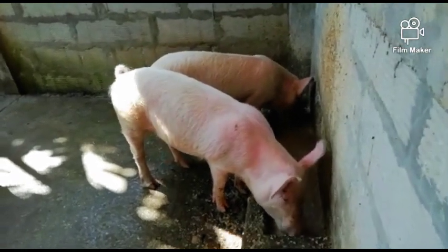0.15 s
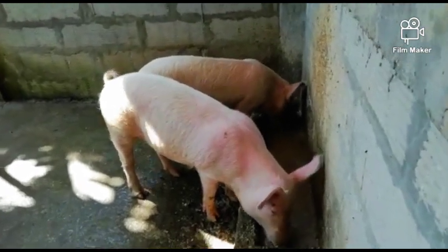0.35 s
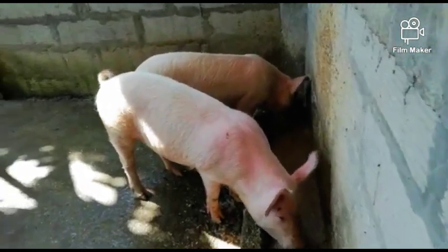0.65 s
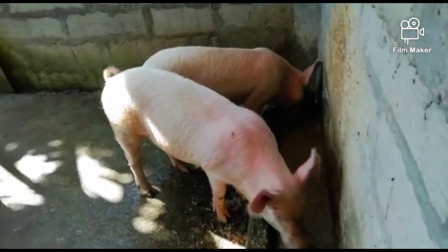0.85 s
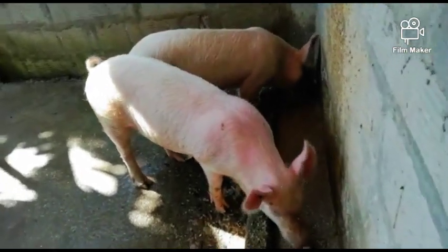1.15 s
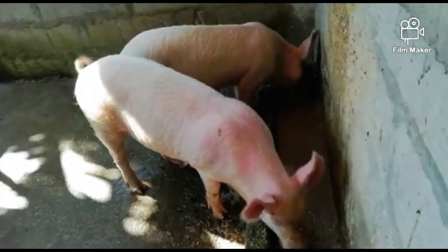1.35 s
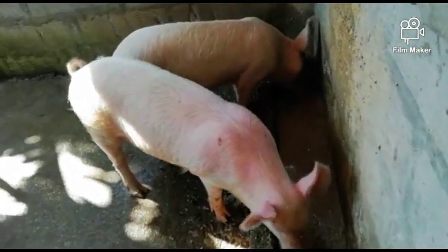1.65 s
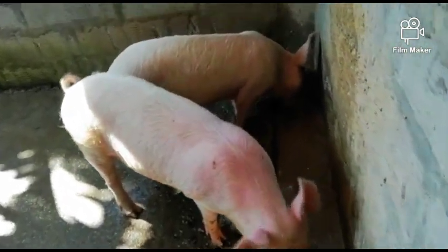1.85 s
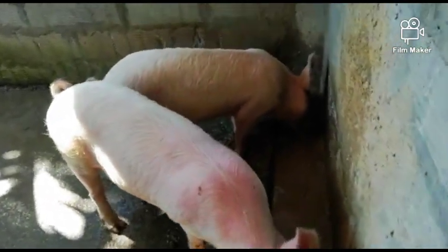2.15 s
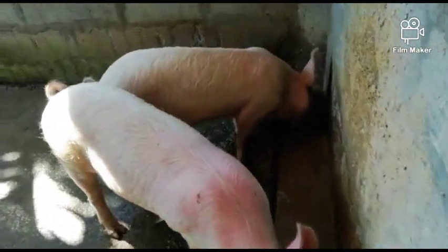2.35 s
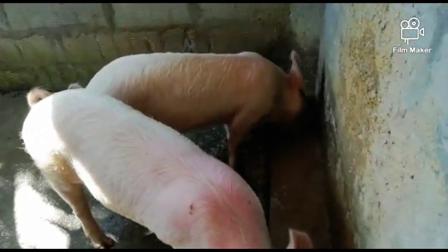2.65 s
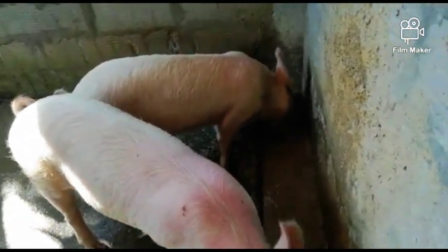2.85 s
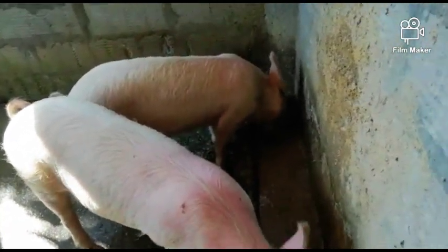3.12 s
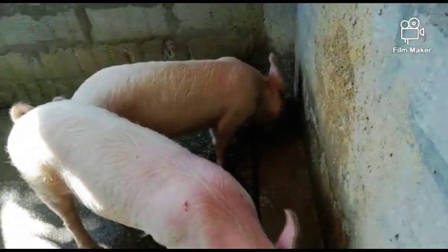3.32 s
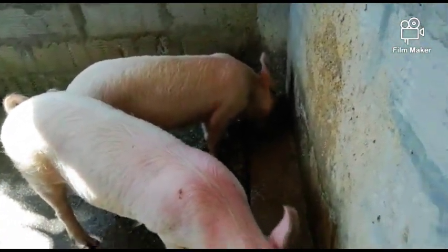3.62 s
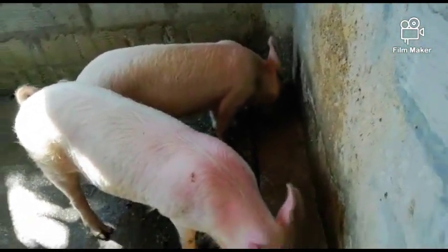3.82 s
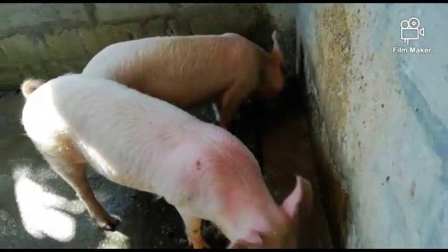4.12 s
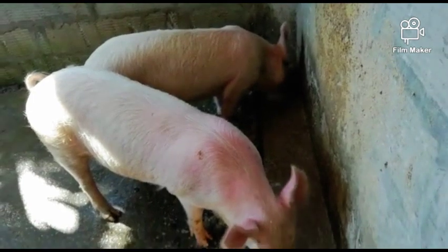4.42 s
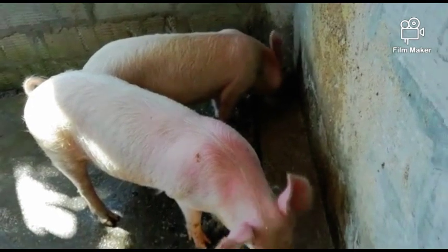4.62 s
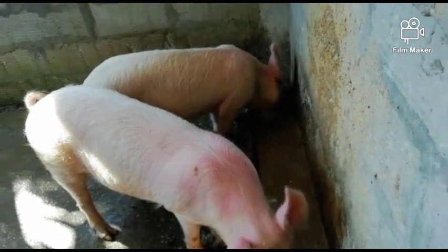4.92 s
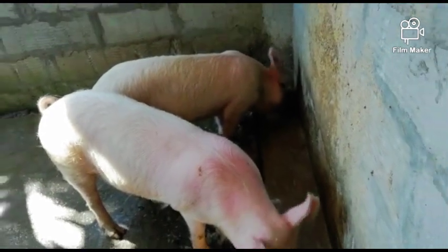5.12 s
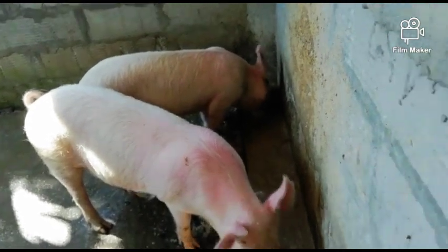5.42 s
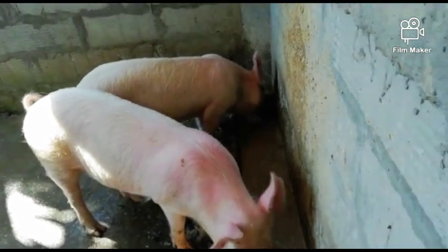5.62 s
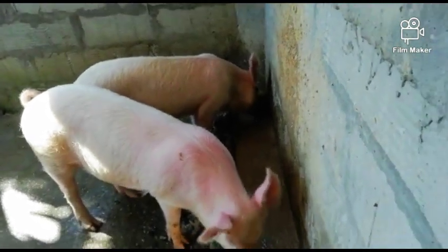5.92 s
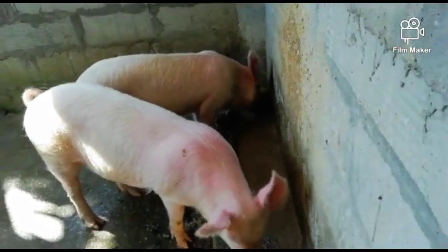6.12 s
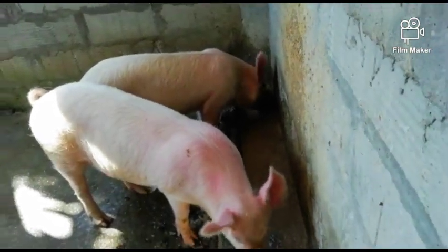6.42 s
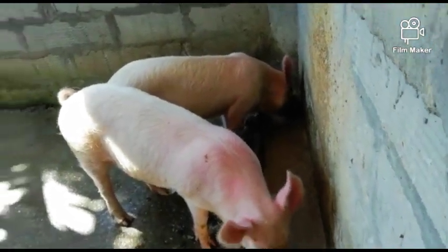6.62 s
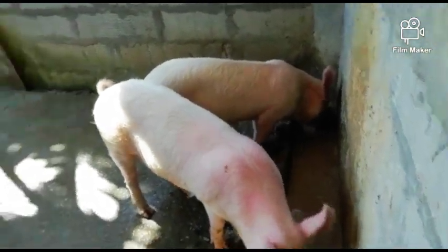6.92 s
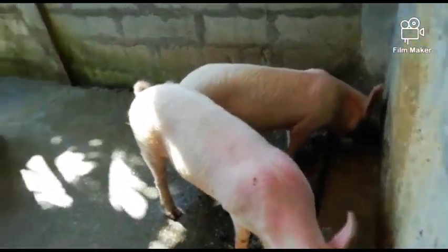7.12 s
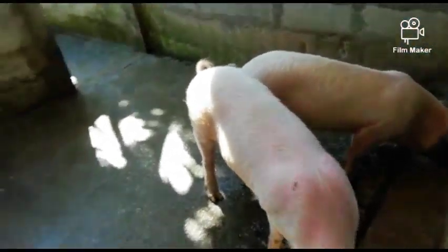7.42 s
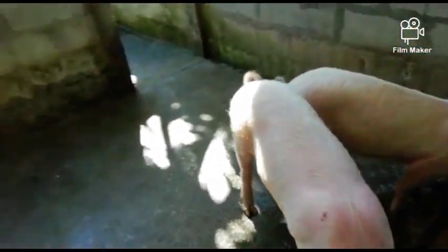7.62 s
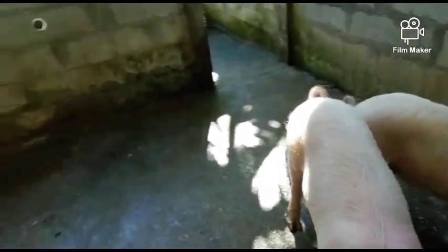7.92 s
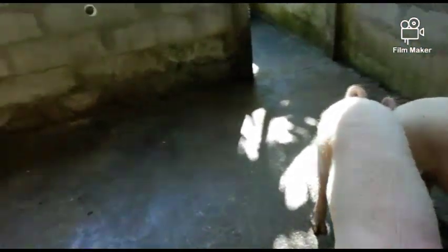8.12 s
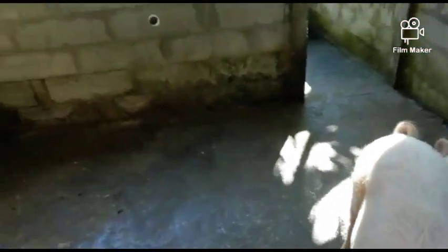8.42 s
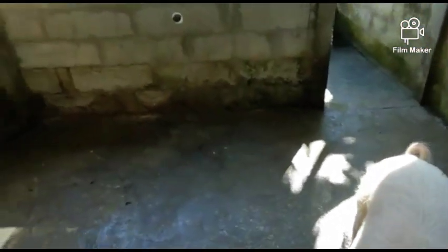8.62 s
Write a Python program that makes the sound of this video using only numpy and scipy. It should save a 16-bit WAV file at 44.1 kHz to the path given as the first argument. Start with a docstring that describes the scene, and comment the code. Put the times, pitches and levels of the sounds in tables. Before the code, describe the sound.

Close wet pig chewing with lip smacks and crackling spittle, broken by occasional low pulsing grunts that resonate between hard walls, plus light wind buffeting.

```python
"""Two young pigs feed at a wet trough in a small concrete pen, close to a hand-held microphone.
Over a steady yard hush, mash grains squelch and spittle crackles; air buffets the microphone now and then.
Sucked-in mash slurps, parting lips smack, films of spittle snap and thin wet whistles squeak in between.
Four short grunts, trains of throat pulses each with a vowel of its own, boom between the walls.
Soft throaty murmurs follow the first, snouts knock on the trough, and the third breaks into a hoarse moan."""
import sys
import numpy as np
from scipy import signal
from scipy.fft import rfft, irfft, next_fast_len
from scipy.io import wavfile
from scipy.ndimage import map_coordinates

SR = 44100
rng = np.random.default_rng(int(sys.argv[2]) if len(sys.argv) > 2 else 0)


def unload_wav(signal):
    """Save mono or channel-first audio to the path in sys.argv[1] as 16-bit WAV at rate SR, clipped to [-1, 1]."""
    wavfile.write(
        sys.argv[1],
        SR,
        np.round(np.clip(np.atleast_2d(signal).T, -1, 1) * 32767).astype(np.int16),
    )


N = 386316
TIME = np.arange(N) / SR

# how busily the pigs chew, before each layer's own trim: time_s, level_db
CHEWING_LEVELS = [(0.0, -56.5), (0.88, -52.5), (1.39, -60.5), (1.95, -55), (2.1, -47), (2.45, -56.5),
                  (3.07, -58.5), (4.03, -56.5), (4.78, -58.5), (5.08, -50), (5.29, -59), (6.17, -58.5),
                  (6.44, -52.5), (6.8, -57.5), (7.37, -56), (7.54, -53), (7.88, -57.5), (8.42, -55.5)]
# the low vowel resonance, whose pitch follows the jaw: width_hz, level_db, change_db_per_s
JAW_RESONANCE = (136, 3.8, -27)


def from_db(db):
    """Decibels to an amplitude factor."""
    return 10 ** (np.asarray(db) / 20)


def rms_one(x):
    """Scale a signal to an rms of 1."""
    return x / np.sqrt(np.mean(x ** 2) + 1e-20)


def at_hz(points, hz):
    """Read a spectrum on a log-frequency axis."""
    points = np.array(points)
    return np.interp(np.log(hz + 1e-9), np.log(points[:, 0]), points[:, 1])


def colour(x, spectrum):
    """Give a signal a spectral shape."""
    size = next_fast_len(x.shape[-1])
    gain = from_db(at_hz(spectrum, np.fft.rfftfreq(size, 1 / SR)))
    return irfft(rfft(x, size) * gain, size)[..., :x.shape[-1]]


def resonate(x, hz, width_hz):
    """One resonance with gain 1 on top."""
    r = np.exp(-np.pi * width_hz / SR)
    feed = np.array([1, 0, -1]) * (1 - r * r) / 2
    feedback = [1, -2 * r * np.cos(2 * np.pi * hz / SR), r * r]
    return signal.lfilter(feed, feedback, x + 1e-18)


def band_of(x, hz, width_hz):
    """A resonance applied twice, for dark valleys on both sides."""
    return resonate(resonate(x, hz, 1.5 * width_hz), hz, 1.5 * width_hz)


def bandpass(x, low_hz, high_hz):
    """Keep what lies between two frequencies."""
    return signal.sosfilt(signal.butter(2, [low_hz, high_hz], "band", fs=SR, output="sos"), x)


def swell(t, middle_s, length_s):
    """A smooth rise and fall."""
    return np.exp(-2 * ((t - middle_s) / length_s) ** 2)


def grains(size, per_s, spread_db):
    """Tiny clicks of uneven strength at random moments."""
    strength = from_db(spread_db * np.minimum(rng.exponential(1, size), 4))
    return (rng.random(size) < per_s / SR) * strength * rng.choice([-1, 1], size)


def slow_noise(size, width_hz):
    """Two unrelated wandering values; spread 1."""
    lowpass = signal.butter(2, width_hz / 2, fs=SR, output="sos")
    return rms_one(signal.sosfilt(lowpass, rng.standard_normal((2, size))))


def rough_tone(hz, width_hz):
    """Air in one resonance whose centre follows the curve hz; rms about 1."""
    rough = slow_noise(len(hz), width_hz)
    phase = 2 * np.pi * np.cumsum(hz) / SR
    return rough[0] * np.cos(phase) + rough[1] * np.sin(phase)


def panned(x, pan_db):
    """Spread a signal over two channels, the left louder by pan_db."""
    return x * from_db(np.array([[.5], [-.5]]) * pan_db)


def add(out, s, x):
    """Mix x in from time s on."""
    i = max(round(s * SR), 0)
    out[..., i:i + x.shape[-1]] += x[..., :N - i]


def diffuse(pair):
    """Two unrelated signals become a sound field whose left-right likeness depends on frequency."""
    # left against right: pitch_hz, likeness (1 same, 0 unrelated, -1 opposite)
    ear_likeness = [(100, 0.74), (300, 1), (600, -0.28), (1200, 0.5), (2500, 0)]
    size = next_fast_len(N)
    alike = np.clip(at_hz(ear_likeness, np.fft.rfftfreq(size, 1 / SR)), -1, 1)
    mid, side = rfft(pair, size)
    field = np.sqrt(1 + alike) * mid + np.sqrt(1 - alike) * side * [[1], [-1]]
    return rms_one(irfft(field, size)[:, :N])


def pen(x, build_s):
    """Dense echoes off bare concrete, different at each ear; the treble dies first."""
    # ring of the pen: pitch_hz, t60_s
    ring_times = [(250, 0.53), (900, 0.29), (2000, 0.28), (5500, 0.25), (14000, 0.22)]
    t = TIME[:SR // 2]
    echoes, edges = 0, np.geomspace(250, 16000, 9)
    for low, high in zip(edges, edges[1:]):
        band = bandpass(rng.standard_normal((2, len(t))), low, high)
        echoes = echoes + band * from_db(-60 * t / at_hz(ring_times, np.sqrt(low * high)))
    # the echoes build up gradually, with extra weight on the earliest
    echoes = echoes * (1 - np.exp(-t / build_s)) * (1 + 2.05 * np.exp(-t / 0.0049))
    return signal.fftconvolve(x, rms_one(echoes) / np.sqrt(len(t)), axes=1)[:, :N]


def faint_events(per_s, scatter_db=5.0):
    """Loosely spaced moments of chewing: rows of (s, level dB, a chance value 0-1)."""
    when, strength, chance = rng.random((100, 3)).T
    s = (np.arange(len(when)) + when) / per_s
    level_db = np.interp(s, *np.transpose(CHEWING_LEVELS)) + scatter_db * (2 * strength - 1)
    return np.column_stack([s, level_db, chance])[s < TIME[-1]]


def pitch_in(range_hz, share):
    """A pitch some share of the way up a range, on a log axis."""
    low, high = range_hz
    return low * (high / low) ** share


def yard(level_db=-55):
    """A steady wide background hush: coloured noise in a diffuse field."""
    # background spectrum: pitch_hz, level_db
    yard_spectrum = [(15, -28), (25, 4), (126, -1), (297, -3), (598, -5), (1080, -2.5), (1750, -4.5),
                     (2560, -10), (4040, -10.5), (6500, -9), (7700, -25.5), (15000, -16)]
    return from_db(level_db) * diffuse(colour(rng.standard_normal((2, N)), yard_spectrum))


def chewing(mash_db=-3.5, spittle_db=-9.5, direct_db=-5.0, room_db=-2.0,
            restless_db=2.5, patchy_db=4.5, clumps_per_s=70):
    """Mash squelches in fine grains, spittle crackles; as the mouth moves, clumps stand out by pitch."""
    # spectrum of the squelching mash: pitch_hz, level_db
    mash_spectrum = [(200, 1.5), (350, -1), (600, -7.5), (900, 2), (1700, 0), (3200, -3.5), (4500, -20),
                     (8000, -36)]
    # spectrum of the crackling spittle: pitch_hz, level_db
    spittle_spectrum = [(2500, -7), (4000, -2), (5400, 0), (6700, 1), (7800, -11), (10500, -6.5),
                        (15000, -26)]
    mash = rms_one(colour(grains(N, per_s=900, spread_db=4.5), mash_spectrum))
    spittle = rms_one(colour(grains(N, per_s=900, spread_db=4.5), spittle_spectrum))
    busy = from_db(np.interp(TIME, *np.transpose(CHEWING_LEVELS)))
    food = busy * (from_db(mash_db) * mash + from_db(spittle_db) * spittle)
    moments, edges = np.arange(0, TIME[-1], 1 / clumps_per_s), np.geomspace(200, 16000, 13)
    near, together_db = 0, restless_db * rng.standard_normal(len(moments))
    for low, high in zip(edges, edges[1:]):
        apart_db = patchy_db * np.clip(rng.standard_normal(len(moments)), -2, 2)
        clumps = np.interp(TIME, moments, from_db(together_db + apart_db))
        near = clumps * bandpass(food, low, high) - near  # neighbours alternate in sign
    near = panned(near, 0)
    return from_db(direct_db) * near + from_db(room_db) * pen(near, build_s=0.00032)


def puffs():
    """Moving air makes a lumpy rumble on the microphone."""
    # air on the microphone: middle_s, length_s, level_db
    puff_list = [(0.025, 0.037, -44), (0.224, 0.075, -43.5), (0.37, 0.069, -45), (1.734, 0.11, -44.5),
                 (6.802, 0.021, -41), (8.3, 0.11, -49), (8.655, 0.17, -38.5)]
    # spectrum of the rumble: pitch_hz, level_db
    buffet_spectrum = [(15, -26), (40, 7.5), (85, -1.5), (160, -9.5), (300, -35), (800, -67)]
    strength = sum(from_db(level_db) * swell(TIME, s, length_s) for s, length_s, level_db in puff_list)
    return strength * rms_one(colour(rng.standard_normal(N), buffet_spectrum))


def slurps(spread_db=5.5, direct_db=-1.0, room_db=1.5, ring_share=0.27):
    """Wet feed is sucked in: a run of tiny squelches, each ringing one of five hollows of the mouth."""
    # slurps before the direct and room trims: middle_s, length_s, level_db, pitch_hz, width_octaves
    slurp_list = [(0.34, 0.46, -62, 6430, 0.24), (0.937, 0.075, -49.5, 580, 2.1),
                  (1.103, 0.035, -47, 1440, 1.2), (1.355, 0.036, -46, 5400, 0.46),
                  (1.68, 0.025, -44.5, 2810, 0.57), (1.956, 0.012, -43, 2640, 0.8),
                  (2.059, 0.032, -47.5, 3000, 1.8), (2.06, 0.015, -47.5, 12600, 0.68),
                  (2.151, 0.06, -50, 990, 2.1), (2.187, 0.079, -63, 11000, 0.99),
                  (2.198, 0.023, -41.5, 1080, 0.56), (2.199, 0.037, -47, 5600, 0.38),
                  (2.471, 0.042, -54, 1680, 0.42), (2.645, 0.083, -48.5, 1300, 0.76),
                  (2.847, 0.083, -51.5, 4700, 0.94), (3.06, 0.011, -51.5, 2650, 0.94),
                  (6.095, 0.022, -51.5, 2380, 0.98), (6.403, 0.31, -55, 4140, 1.0),
                  (7.345, 0.044, -52.5, 2640, 2.4), (7.677, 0.067, -48, 5700, 0.48),
                  (8.255, 0.13, -56, 2300, 1.13)]
    out, t = np.zeros(N), TIME[:SR // 2 - SR // 16]
    half = t[-1] / 2
    for s, length_s, level_db, hz, octaves in slurp_list:
        hollows_hz = hz * 2 ** (octaves * np.linspace(-.5, .5, 5))
        clicks = [grains(len(t), per_s=340, spread_db=spread_db) for _ in hollows_hz]
        width_hz = ring_share * hz * octaves
        suck = rms_one(sum(band_of(c, f, width_hz) for c, f in zip(clicks, hollows_hz)))
        add(out, s - half, from_db(level_db) * suck * swell(t, half, length_s))
    near = panned(out, 3.9)
    return from_db(direct_db) * near + from_db(room_db) * pen(near, build_s=0.00039)


def smacks(mouth_q=4.63, tear_s=0.00091, string_db=-6.0, string_s=0.011, wet_db=-17.5,
           ring_room_db=-2.5, room_db=0.0):
    """Parting lips pop and ring the mouth; a film of wet feed tears, its last strings breaking just after."""
    # lip smacks, and one knock on the trough at 2.961 s sounded the same way: time_s, mouth_ring_db, mouth_hz,
    # squelch_db (on the ring, before wet_db), pan_db
    smack_list = [(0.191, -37.5, 736, 3, -1.5), (0.723, -30.5, 1580, -10, 7), (0.793, -30.5, 875, -11, 4),
                  (0.816, -24, 1640, -5.5, 2), (1.092, -34.5, 1380, 1.5, 8), (1.125, -35, 3020, -6, 15),
                  (1.339, -33.5, 1880, -4.5, 5), (1.668, -29, 1870, -5, 5), (1.914, -36, 1510, -5, 5),
                  (1.949, -33, 2380, -7, 8), (1.969, -26.5, 1730, -12, 4), (2.194, -39, 1100, 4, 2),
                  (2.303, -42.5, 1340, 6.5, 3), (2.961, -37.5, 815, -28, 0), (3.827, -23, 4970, -3, 4.5),
                  (3.842, -21, 4750, -15, -2), (3.882, -31.5, 1320, -14, -1), (5.103, -29, 1140, -2, 5),
                  (5.152, -20.5, 2250, -27, 2.5), (5.238, -30.5, 1160, -9, -1),
                  (5.752, -33.5, 1310, -2.5, 9), (5.772, -37.5, 1700, 5, 2), (5.845, -29, 3840, -28, 6),
                  (5.938, -30.5, 5170, -33, 4), (6.059, -34, 3200, -9, 3), (6.474, -34, 2350, -20, 6),
                  (6.524, -23, 2350, -5, 2), (6.573, -28, 930, -4.5, 5), (7.037, -31.5, 1970, -15, 13),
                  (7.048, -30.5, 2900, -1, 5), (7.382, -33, 1030, 3, 9.5), (8.456, -22.5, 4960, -13.5, 3.5)]
    (pops, wet), t = np.zeros((2, 2, N)), TIME[:SR // 20]
    # faint smacks fall at random between the listed ones, as strong as the chewing
    faint = [(s, db + 11.5, pitch_in((892, 5300), u), -7.5, 0) for s, db, u in faint_events(per_s=5.0)]
    for s, ring_db, hz, squelch_db, pan_db in list(smack_list) + faint:
        mouth = band_of(signal.unit_impulse(len(t)), hz, hz / mouth_q)
        add(pops, s, panned(from_db(ring_db) * mouth / np.abs(mouth).max(), pan_db))
        fade = np.exp(-t / tear_s) + from_db(string_db) * np.exp(-t / string_s)
        tear = grains(len(t), per_s=12000, spread_db=2.0) * fade
        squelch = rms_one(band_of(tear, 1070, 1430) + band_of(tear, 2880, 1120) * 0.39)
        add(wet, s, panned(from_db(ring_db + squelch_db + wet_db) * squelch, pan_db))
    return pops + wet + pen(from_db(ring_room_db) * pops + from_db(room_db) * wet, build_s=0.0027)


def snaps(spit_s=0.00051, low_db=-5.5, high_db=-20.0, low_pan_db=1.0, high_pan_db=10.5,
          low_room_db=0.0, high_room_db=-1.5):
    """A film of spittle bursts: a short crack with a sparkle above it."""
    # films of spittle snap, before the low and high trims: time_s, sparkle_db, crack_db
    snap_list = [(0.1917, -48, -45.5), (0.5373, -36, -47.5), (0.5812, -57, -51), (1.124, -38, -53),
                 (1.9114, -41, -58), (2.3358, -43, -55), (3.8288, -33.5, -41.5), (5.1021, -33.5, -39.5),
                 (5.772, -43, -57), (6.278, -30, -51.5), (6.518, -34, -41.5), (7.3833, -38.5, -44),
                 (7.4146, -34.5, -44.5), (7.7692, -36.5, -50)]
    cracks, sparkles, t = np.zeros(N), np.zeros(N), TIME[:SR // 20]
    # faint snaps fall at random between the listed ones, as strong as the chewing
    faint = [(s, db + 8, db) for s, db, _ in faint_events(per_s=5.0)]
    for s, sparkle_db, crack_db in list(snap_list) + faint:
        spit = grains(len(t), per_s=15000, spread_db=4.5) * t * np.exp(-t / spit_s)
        add(cracks, s, from_db(crack_db + low_db) * rms_one(band_of(spit, 5530, 1300)))
        add(sparkles, s, from_db(sparkle_db + high_db) * rms_one(band_of(spit, 16300, 7500)))
    cracks, sparkles = panned(cracks, low_pan_db), panned(sparkles, high_pan_db)
    to_room = from_db(low_room_db) * cracks + from_db(high_room_db) * sparkles
    return cracks + sparkles + pen(to_room, build_s=0.0024)


def squeaks(waver_hz=350, tremble_db=-1.0, room_db=-3.0):
    """Air squeezed through wet lips or nostrils gives a short, thin, wavering whistle."""
    # wet squeaks: start_s, length_s, level_db, start_hz, end_hz, waver_depth_hz
    squeak_list = [(0.471, 0.013, -43.5, 1220, 1180, 27), (3.738, 0.065, -45.5, 1895, 1765, 155),
                   (8.089, 0.041, -49.5, 1835, 1780, 130), (8.278, 0.067, -62, 2750, 2820, 90),
                   (8.293, 0.092, -50.5, 1278, 1232, 9), (8.464, 0.052, -51.5, 1680, 1713, 46)]
    out = np.zeros(N)
    for s, length_s, level_db, start_hz, end_hz, depth_hz in squeak_list:
        u = np.linspace(0, 1, int(length_s * SR))
        waver, tremble = slow_noise(len(u), waver_hz)
        pitch_hz = start_hz + (end_hz - start_hz) * u + depth_hz * waver
        whistle = np.sin(2 * np.pi * np.cumsum(pitch_hz) / SR)
        add(out, s, from_db(level_db + tremble_db * tremble) * whistle * 2 * np.sqrt(u * (1 - u)))
    return out + from_db(room_db) * pen(panned(out, 0), build_s=0.0023)


def flap(t, late_s, jaw_hz, vowel, flutter=0.25, open_s=0.0017, sag=0.245, glide_s=0.0026,
         wobble=0.025, click_db=-16.0):
    """One throat opening: a click and the low resonances, then a wet slap that rings the upper ones."""
    # throat and snout resonances: pitch_hz, width_hz, level_db, change_db_per_s
    throat = [(365, 84, -21.5, 3), (1532, 106, 3, -16), (2100, 130, 2.5, 18), (2650, 246, 1.5, -66),
              (3350, 420, -10.5, 0)]
    scale, _, _, low_db, bright_db, edge_db, upper_db, slap_s = vowel
    burst = flutter * rng.standard_normal(len(t)) * t / open_s * np.exp(1 - t / open_s)
    burst[0] += 1
    slap = np.pad(burst, (round(abs(slap_s) * SR), 0))[:len(t)]
    drives = zip([burst, burst, slap, slap, slap, slap], [0, low_db, 0, bright_db, edge_db, upper_db])
    resonances = [(scale * hz, *rest) for hz, *rest in throat]
    resonances.insert(1, (jaw_hz, *JAW_RESONANCE))
    ring = from_db(click_db) * band_of(burst, 1710, 870)
    for (hz, width_hz, db, db_per_s), (drive, vowel_db) in zip(resonances, drives):
        # late_s counts from the height of the grunt
        ring = ring + from_db(db + vowel_db + db_per_s * late_s) * band_of(drive, hz, width_hz)
    # the resonances start low and slide up as the passage opens, never twice to quite the same shape
    shape = 1 + wobble * (2 * rng.random() - 1)
    read_at = SR * shape * (t - sag * glide_s * (1 - np.exp(-t / glide_s)))
    return map_coordinates(ring, [read_at], order=3)


def grunts(voice_db=23.0, chest_db=39.5, boom_db=7.0, room_db=0.0, ear_lag_s=0.0002,
           rasp_flutter=0.35, jaw_db=0.5, jaw_widest_s=0.1, jaw_swing_s=0.08):
    """The throat flaps some forty times a second; each flap thumps chest and snout, and air rasps after."""
    # efforts: start_s, loudest_after_s, rise_s, fade_s, effort_db, snout_over_chest_db_per_s, rasp_db, pan_db
    grunt_list = [(0.582, 0.055, 0.079, 0.024, -22.5, -150, -24, -3),
                  (4.788, 0.06, 0.075, 0.038, -12.5, -12, -39, -1),
                  (5.57, 0.059, 0.066, 0.12, -22.5, -33, -19.5, 1),
                  (7.447, 0.049, 0.075, 0.016, -18.5, 74, -21, 2)]
    # the mouth in each grunt: resonance_scale, jaw_shut_hz, jaw_open_hz, low_vowel_db, bright_vowel_db,
    # edge_db, upper_edge_db, slap_after_opening_s
    vowels = [(1.005, 890, 950, -2.5, -11, -8.5, -37, 0.00203),
              (1.021, 980, 910, -14.5, -7.5, -24.5, -39, 0.00057),
              (0.97, 820, 1020, -5, -13, -22, -30, 0.00101), (0.99, 900, 1100, -11, -3.5, -19, -5, 0.0062)]
    # the chest in each grunt: start_hz, glide_octaves_per_s, level_db
    chests = [(159, -5.5, -1), (162, -7.5, -9.5), (162, -0.5, -5), (180, -7.5, -10)]
    # the nostrils hiss in each grunt: middle_after_start_s, length_s, level_db, pitch_hz, width_hz
    nostrils = [(0.04, 0.031, -52, 5150, 400), (0.069, 0.065, -52, 4780, 740),
                (0.099, 0.21, -60, 5800, 1600), (0.055, 0.017, -51, 4950, 370)]
    # how fast the throat flaps in each grunt: pulses_per_s, quickening_per_s2
    flap_rates = [(35.2, 0), (37.2, 0), (38.2, 80), (37, 0)]
    # air rasping through the snout: pitch_hz, width_hz, level_db
    snout = [(1443, 94, 0), (2010, 550, -4), (3120, 1000, 2), (5330, 800, -25)]
    # the nearest walls: delay_s, level_db
    walls = [(.0054, -5), (0.0106, -0.5), (0.0169, -2)]
    # standing waves between the walls, before boom_db: pitch_hz, level_db, t60_s
    pen_modes = [(81.6, 9, 0.68), (111.3, 5.5, 0.41), (156, 7.5, 0.56), (182, 4.5, 0.51),
                 (219.5, 3.5, 0.56)]
    voice, chest, t = np.zeros((2, N)), np.zeros(N), TIME[:SR // 4]
    for grunt, vowel, body, nostril, pace in zip(grunt_list, vowels, chests, nostrils, flap_rates):
        s, top_s, rise_s, fade_s, effort_db, brightening, air_db, pan_db = grunt
        chest_hz, glide, depth_db = body
        rate, quickening = pace
        envelope = np.where(t < top_s, swell(t, top_s, rise_s), swell(t, top_s, fade_s))
        effort = from_db(effort_db) * envelope
        _, shut_hz, open_hz, *_ = vowel
        jaw_hz = shut_hz + (open_hz - shut_hz) * swell(t, jaw_widest_s, jaw_swing_s)
        cycles = rate * t + quickening * t * t / 2
        for i in np.flatnonzero(np.diff(np.floor(cycles), prepend=-1)):
            # no two flaps agree: timing in s, strength in dB, chest pitch in octaves
            slip_s, uneven_db, detune = rng.normal(0, [.0005, .8, .08])
            late_s, when = t[i] - top_s, s + t[i] + slip_s
            pulse = effort[i] * flap(t[:SR // 20], late_s, jaw_hz[i], vowel)
            add(voice, when, panned(from_db(voice_db + brightening * late_s + uneven_db) * pulse, pan_db))
            thump_hz = chest_hz * 2 ** (glide * t[i] + detune)
            thump = resonate(signal.unit_impulse(SR // 10), thump_hz, thump_hz / 2)
            add(chest, when, from_db(chest_db + depth_db) * effort[i] * thump)
        # the rasp swells as the voice gives out; its lowest resonance bends with the jaw
        rasp_s = top_s + 0.43 * fade_s
        rasp = sum(from_db(db) * rough_tone(np.full(len(t), f), w) for f, w, db in snout)
        rasp = rms_one(rasp + from_db(jaw_db) * rough_tone(jaw_hz, JAW_RESONANCE[0]))
        air = from_db(effort_db + air_db) * rasp * swell(t, rasp_s, 0.43 * fade_s)
        hiss_s, hiss_length_s, hiss_db, hiss_hz, hiss_width_hz = nostril
        hiss = rough_tone(np.full(len(t), hiss_hz), hiss_width_hz)
        air = air + from_db(hiss_db) * hiss * swell(t, hiss_s, hiss_length_s)
        add(voice, s, panned(air * (1 + rasp_flutter * np.cos(2 * np.pi * cycles - 1)), pan_db))
    chest = bandpass(chest + 1e-18, 55, 290)
    # the thump comes back off the walls, to one ear first, and builds up standing waves
    arrival = TIME + np.array([[1], [-1]]) * ear_lag_s
    slap = sum(from_db(db) * np.interp(arrival - delay_s, TIME, chest) for delay_s, db in walls)
    boom = sum(from_db(db) * resonate(chest, hz, np.log(1000) / np.pi / t60) for hz, db, t60 in pen_modes)
    return voice + from_db(room_db) * pen(voice, build_s=0.0085) + chest + slap + from_db(boom_db) * boom


def murmurs(room_db=-7.0):
    """Rough closed-mouth sounds: one low resonance that sinks a little."""
    # soft throaty sounds: start_s, length_s, level_db, start_hz, end_hz, width_hz
    murmur_list = [(1.061, 0.11, -51.5, 182, 179, 49.4), (1.966, 0.35, -49, 206.8, 173.3, 124),
                   (2.755, 0.066, -53, 266, 244, 70), (4.469, 0.18, -47.5, 375, 325, 133)]
    out = np.zeros(N)
    for s, length_s, level_db, start_hz, end_hz, width_hz in murmur_list:
        u = np.linspace(0, 1, int(length_s * SR))
        throb = rough_tone(start_hz + (end_hz - start_hz) * u, width_hz)
        add(out, s, from_db(level_db) * throb * np.sqrt(1 - u))
    return out + from_db(room_db) * pen(panned(out, 0), build_s=0.001)


def knocks(contact_s=0.0013, knock_db=-11.5, room_db=0.0):
    """A wet snout bumps the concrete trough with a dull, short thud."""
    # a snout knocks on the trough, before knock_db: time_s, level_db
    knock_list = [(2.894, -43.5), (3.882, -42.5), (6.576, -37), (7.389, -38)]
    out, t = np.zeros(N), TIME[:SR // 20]
    for s, level_db in knock_list:
        contact = grains(len(t), per_s=11000, spread_db=2.5) * np.exp(-t / contact_s)
        thud = rms_one(resonate(resonate(contact, 280, 250), 870, 380))
        add(out, s, from_db(level_db + knock_db) * thud)
    return out + from_db(room_db) * pen(panned(out, 0), build_s=0.012)


def moan(width_hz=30, room_db=-3.0):
    """The long grunt breaks into a hoarse tone, a narrow noise band that sinks and lifts again."""
    # the hoarse tone in the long grunt: time_s, pitch_hz, level_db
    moan_curve = [(5.632, 630, -54), (5.641, 610, -38), (5.68, 506, -50), (5.74, 595, -54)]
    s, hz, level_db = np.transpose(moan_curve)
    t, out = np.arange(s[0], s[-1], 1 / SR), np.zeros(N)
    tone = rough_tone(np.interp(t, s, hz), width_hz)
    add(out, s[0], from_db(np.interp(t, s, level_db)) * tone)
    return out + from_db(room_db) * pen(panned(out, 0), build_s=0.003)


def scene():
    """Mix the pigs, the air and the yard."""
    feeding = chewing() + slurps() + smacks() + snaps() + knocks()
    voices = squeaks() + grunts() + murmurs() + moan()
    return yard() + puffs() + feeding + voices


def record(dry, cutoff_hz=15800):
    """The two microphone ports differ in colour; the top is cut."""
    # left against right port: pitch_hz, difference_db
    port_lean = [(200, 1.5), (500, -1.5), (1200, -2.5), (2500, 1.5), (4800, -2), (7000, -9.5), (9500, 2),
                 (13000, 8)]
    lean = np.array(port_lean)
    gains = from_db(np.outer([.5, -.5], lean[:, 1]))
    gains_db = 20 * np.log10(gains / np.sqrt(np.mean(gains ** 2, axis=0)))
    heard = np.array([colour(x, np.column_stack([lean[:, 0], db])) for x, db in zip(dry, gains_db)])
    heard[0] = np.roll(heard[0], 2)  # the sound reaches the left port two samples later
    return signal.sosfilt(signal.ellip(10, .2, 80, cutoff_hz, fs=SR, output="sos"), heard)


dry = scene()
out = record(dry)
unload_wav(out)
```